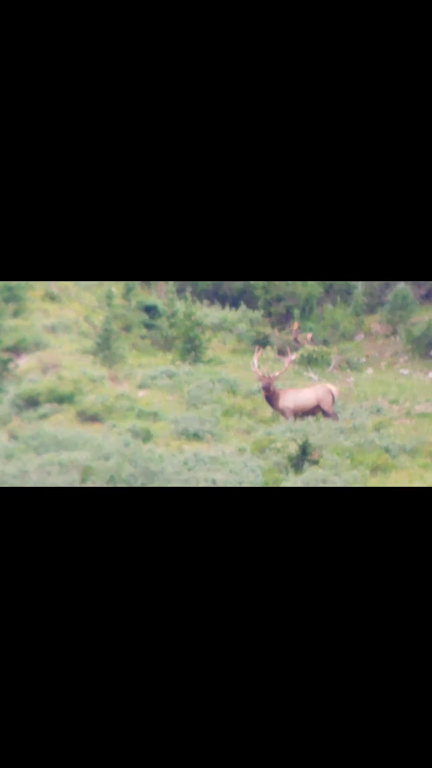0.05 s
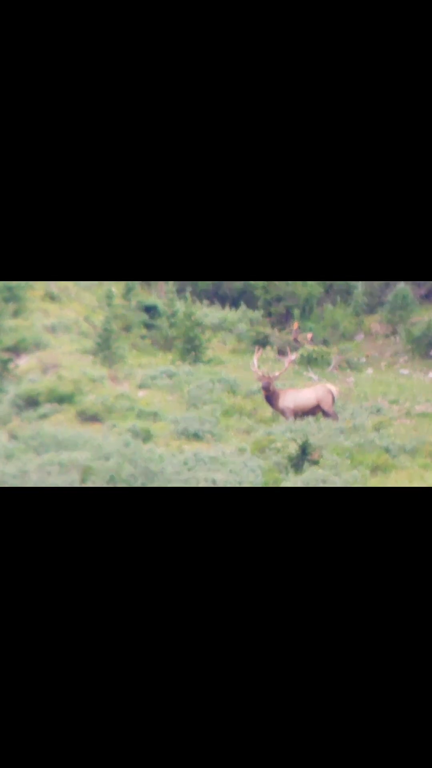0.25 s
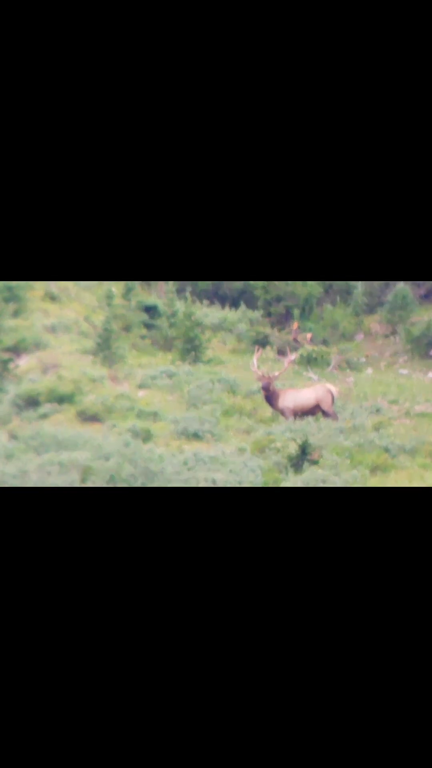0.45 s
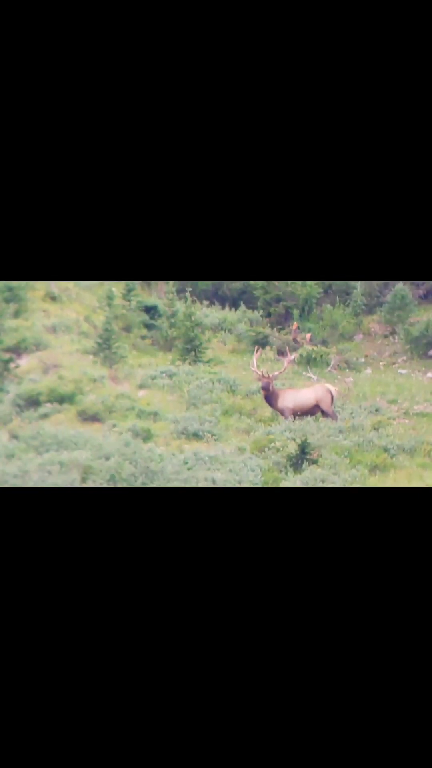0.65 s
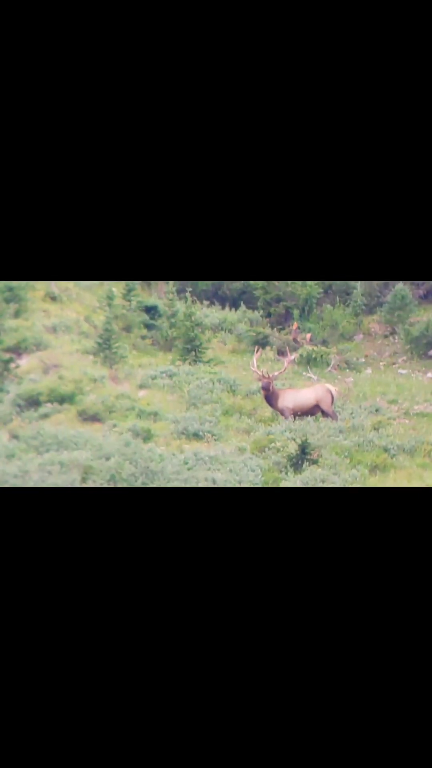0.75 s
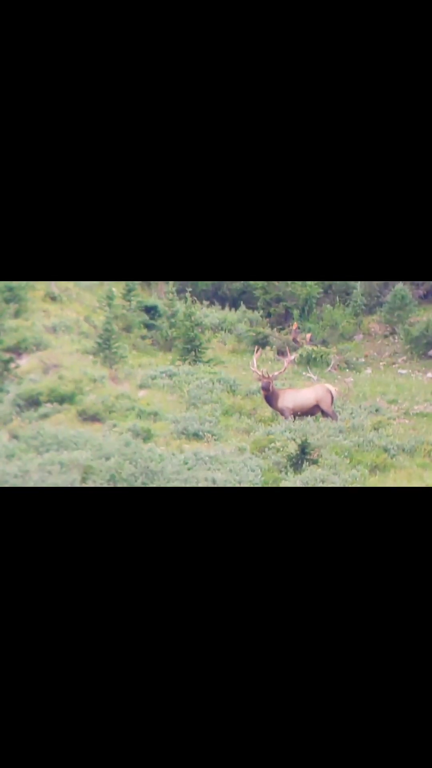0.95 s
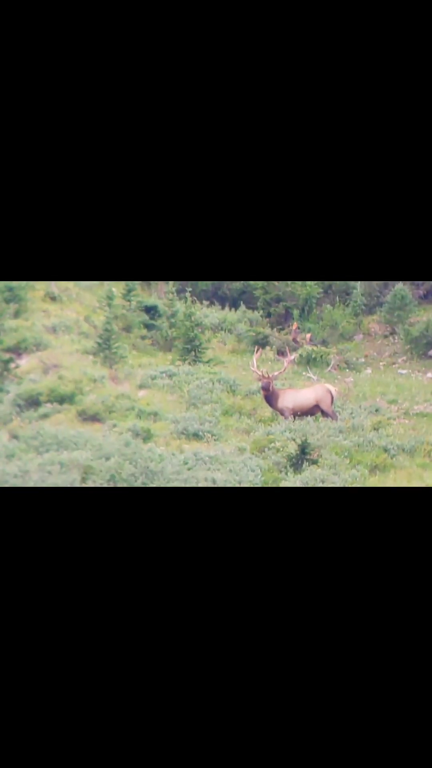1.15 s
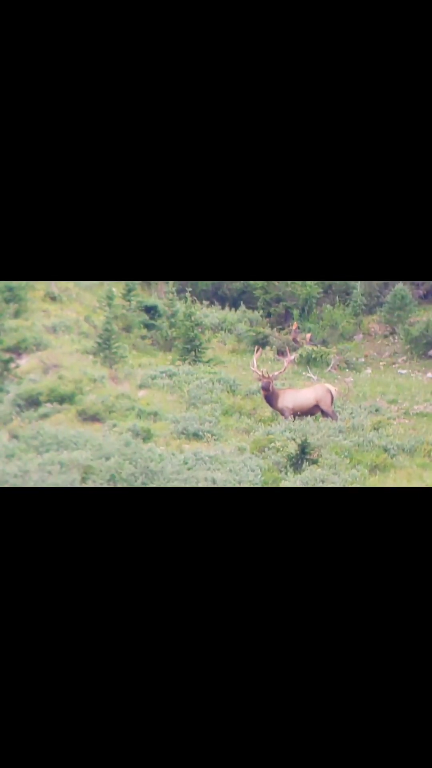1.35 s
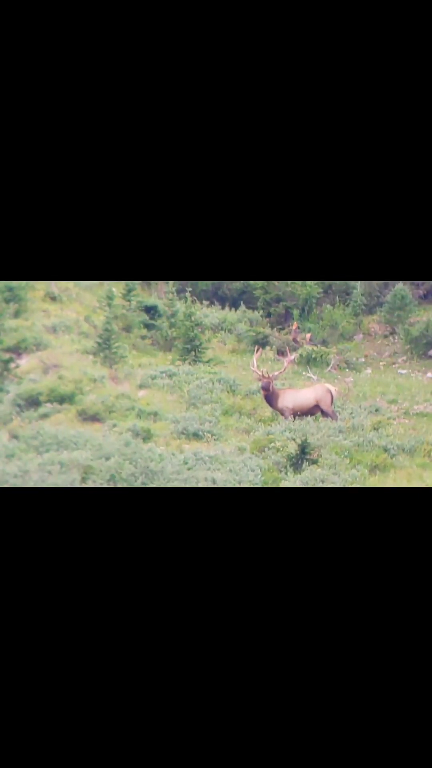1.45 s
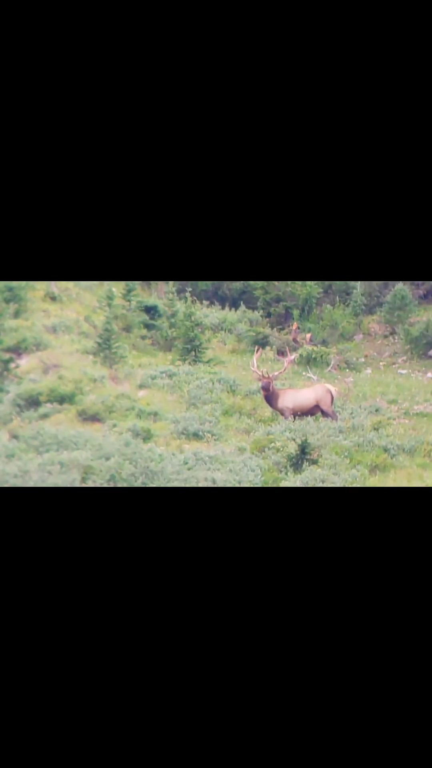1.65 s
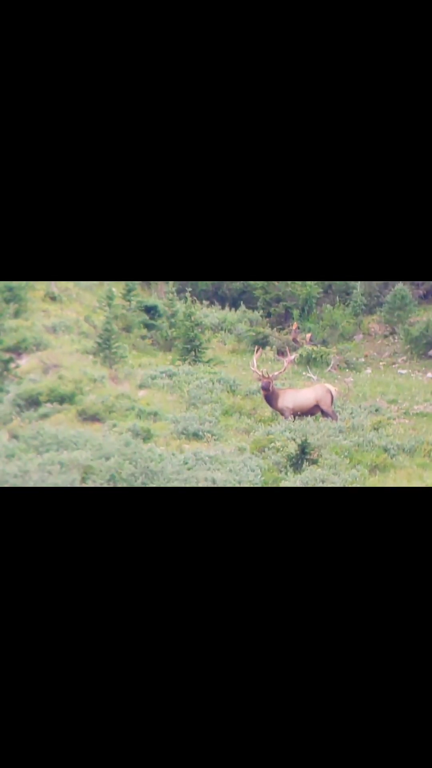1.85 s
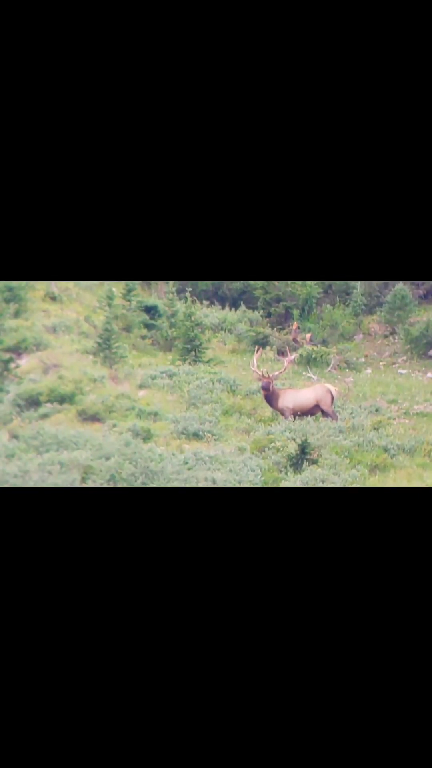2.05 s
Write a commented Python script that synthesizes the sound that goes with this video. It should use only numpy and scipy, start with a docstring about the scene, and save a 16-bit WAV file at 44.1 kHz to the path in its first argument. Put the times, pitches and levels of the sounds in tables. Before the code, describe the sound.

A fly buzzes close to the microphone on the left, coming in at about 0.2 seconds with a slightly wavering pitch. It is loudest near 0.5 seconds, swerves past and is gone by 0.9. A tiny, faint rustle comes at around 0.4 seconds. Light wind rumbles throughout with soft bumps on the microphone, easing toward the end at 2 seconds, over a faint hiss and a distant rush.

```python
"""Light wind rumbles in an open meadow, over a faint hiss and a far rush, like a road, from the right.
Almost at once a fly buzzes up to the left port of the microphone, hovers, swerves past and is gone.
Its wingbeat is a stack of harmonics whose balance shifts as it turns. Eddies bump each port on its
own throughout, and something rustles briefly as the fly comes alongside."""
import sys
import numpy as np
from scipy import signal
from scipy.fft import rfft, irfft
from scipy.io import wavfile
from scipy.ndimage import uniform_filter1d

SR = 44100
rng = np.random.default_rng(int(sys.argv[2]) if len(sys.argv) > 2 else 0)


def to_wav(s):
    """Save 16-bit WAV."""
    ch = np.atleast_2d(s).T  # columns
    pcm = np.round(np.clip(ch, -1, 1) * 32767)  # PCM
    wavfile.write(sys.argv[1], SR, pcm.astype(np.int16))


N = 92610

# tone of the wind's rumble: frequency_hz, gain_db
RUMBLE_EQ = [(12, -9), (25, 0), (70, -2), (110, -10), (200, -25), (350, -39), (800, -77)]
# eddies bumping a port: peak_s, level_db, pitch_hz, width_s, port (0 left, 1 right)
WIND_BUMPS = [(0.088, -38, 59.9, 0.019, 0), (0.24, -29, 50, 0.017, 0), (0.547, -34.5, 60.6, .008, 0),
              (0.857, -29, 140.6, 0.0026, 0), (.89, -43, 40.25, 0.033, 0), (1.301, -39, 43, 0.021, 0),
              (1.607, -42, 40.5, 0.012, 0), (0.048, -39.5, 36, 0.022, 1), (0.498, -26, 45, 0.0093, 1),
              (0.614, -34.5, 51.7, 0.0093, 1), (1.147, -39, 39.2, 0.034, 1), (1.254, -25.5, 84, 0.0047, 1),
              (1.296, -36.5, 41.3, 0.045, 1), (1.541, -35.5, 59.5, 0.009, 1), (1.645, -27.5, 61, 0.0049, 1),
              (1.782, -38.5, 51, 0.012, 1), (1.815, -28.5, 48, 0.0053, 1), (1.97, -39, 40.3, 0.014, 1)]
RUMBLE_START_DB, GUST_DB, LULL_DB_PER_S = (-50.5, -48), 2, -5  # starting levels: left, right
TURBULENCE_DB, WAKE_S = -14.5, 0.009  # a bump's wake: level against the bump, extra width

# tone of the far rush: frequency_hz, gain_db
RUSH_EQ = [(200, -15.5), (500, -19.5), (700, -10.5), (830, -2.5), (1000, -3), (1300, 2.5), (1500, 1),
           (1720, 0.5), (2000, -8), (2500, -15), (3000, -27.5), (6000, -52.5)]
# fader ride on the far rush: time_s, level_db
RUSH_LEVEL = [(0, -59), (.2, -59), (.6, -57), (.93, -65), (1.2, -60), (1.45, -63), (1.68, -61),
              (1.85, -66.5), (2.1, -68.5)]
# duller tone of the rush at the left port, which faces away: frequency_hz, gain_db
SHADOW_EQ = [(600, 3), (850, 4.5), (1000, -1), (1300, 0.5), (1600, -9.5), (2000, -13), (2500, -9.5)]
LEFT_LAG_S = .00046
WHINE_HZ, WHINE_DB, WHINE_PEAK_S, WHINE_WIDTH_S = 812, -60.5, 1.376, 0.021

# tone of the air and microphone hiss: frequency_hz, gain_db
HISS_EQ = [(250, 1.5), (1600, -1.5), (2300, -10.5), (6000, -24), (7300, -23.5), (8500, -35), (10000, -32.5),
           (11500, -26.5), (15000, -30)]
HISS_START_DB, HISS_FADE_DB_PER_S = -66, -2.5

# the fly's wingbeat: time_s, pitch_hz
WINGBEAT = [(0.0, 380.8), (0.06, 376.3), (0.095, 390.2), (0.122, 359), (0.142, 352), (0.16, 378),
            (0.178, 382.8), (0.197, 365), (0.222, 373.6), (0.238, 383.5), (0.256, 378.8), (0.272, 391.9),
            (0.288, 379.7), (0.304, 374.5), (0.325, 393.7), (0.339, 387.5), (0.351, 400.7), (0.367, 380),
            (0.382, 386), (0.401, 376.1), (0.418, 391), (0.452, 389.7), (0.482, 381.1), (0.508, 386.1),
            (0.523, 396.6), (0.549, 362.8), (0.603, 376.3), (0.626, 365), (0.65, 390.0), (0.668, 363),
            (0.697, 383.5), (0.716, 363), (0.739, 392.2), (0.75, 371.5), (0.764, 396.6), (0.786, 378.4),
            (0.814, 400.7), (0.835, 382), (0.88, 388.7)]
# fader rides on the buzz: time_s, fundamental_db, octave_db, fourth_db, middle_db, treble_db
BUZZ_LEVELS = [(0.0, -63, -64.5, -79, -81, -81), (0.1, -55, -49.5, -75, -70, -82),
               (0.125, -56, -53, -71.5, -71, -83.5), (0.172, -34.5, -34.5, -44, -55.5, -72.5),
               (0.2, -32, -40, -49.5, -55, -76.5), (0.27, -29, -33.5, -47, -50.5, -69.5),
               (0.335, -30, -30.5, -44.5, -51, -67.5), (0.356, -26, -26.5, -43, -45.5, -58),
               (0.395, -26.5, -31.5, -44.0, -47, -57.0), (0.425, -23.5, -24.5, -38, -44.5, -55.5),
               (0.46, -21, -24, -34.0, -43, -57.5), (0.485, -22.5, -27, -36, -46, -68.5),
               (0.508, -18, -24, -36.0, -40.5, -54), (0.532, -15.5, -26.0, -30, -41.5, -70.5),
               (0.56, -21, -38.5, -43, -46.5, -69), (0.595, -25, -55.5, -53, -46.5, -71),
               (0.632, -23.5, -38.0, -46.0, -44.0, -62.5), (0.652, -26, -53, -53.5, -52, -75.0),
               (0.678, -31.5, -34, -52, -47, -64.5), (0.697, -37, -45, -72.5, -60.5, -74),
               (0.722, -28.5, -41.0, -65.5, -48.0, -65.5), (0.75, -35.5, -39, -64, -54, -76.5),
               (0.775, -36.5, -35, -49, -51.5, -66.5), (0.815, -34, -36.0, -52.5, -49, -70),
               (0.836, -34.5, -39.5, -64, -57.5, -77), (0.856, -39.5, -31.0, -52, -51.5, -67.5),
               (0.895, -74, -66, -77, -81.5, -89)]
# trims on harmonics 5 to 9, a row each, along the fly's path: coming_db, beside_db, leaving_db
MIDDLE_TRIMS = [(0.5, -0.5, -0.5), (-6, -5, -4), (-3, -6.5, -6), (-9.5, -5.5, -14), (-11, -13, -21)]
# tone of harmonics 10 to 28: frequency_hz, coming_db, leaving_db
TREBLE_EQ = [(3800, 1.5, -0.5), (4260, -3.5, -7), (4550, -10, -9.5), (5300, -9.5, -5.5),
             (6080, -8.5, -12.5), (6600, -21, -25.5), (8000, -35, -32), (11000, -42.5, -41.5)]
# tone of the air stirred by the wings: frequency_hz, gain_db
SWISH_EQ = [(200, 7), (600, -12), (1100, -2), (3000, -2.5), (4500, -7.5), (6400, -9), (8500, -27),
            (12000, -17.5), (13000, -36.5)]
ARRIVES_S, CLOSEST_S, SWERVE_S = .34, 0.552, .01  # the fly comes alongside, then swerves past
PITCH_JITTER, SHIMMER_DB, TURN_DB = .002, .5, 2.5  # wander: pitch, whole buzz, each upper harmonic
THIRD_COMING_DB, THIRD_LEAVING_DB = -12, -9  # third harmonic, against the fundamental
SWISH_DB, SWISH_FOLLOW, SWISH_DEPTH = -62, 0.49, .7  # at top treble; share of its swing; stroke pulse
FLY_RIGHT_DB = -64.5  # against the left port

# swells of the rustle: peak_s, level_db, width_s
RUSTLES = [(.357, -55.5, 0.016), (.398, -53, 0.011), (.535, -63, 0.012)]
# tone of the rustle: frequency_hz, gain_db
RUSTLE_EQ = [(300, -10.5), (1000, -1.5), (2200, 2), (3000, -6), (5000, -14.5), (7000, -16.5), (8500, -32.5),
             (12000, -25.5), (13000, -51)]
RUSTLE_LEFT_BOOST_DB = 3.5

HIGH_CUT_HZ = 15400


def undb(db):
    """Decibels as a gain."""
    return 10 ** (np.asarray(db) / 20)


def curve(table, col=1):
    """A column of a table, joined by straight lines in time."""
    rows = np.array(table, float)
    return np.interp(np.arange(N) / SR, rows[:, 0], rows[:, col])


def eq_gain(eq, hz, col=1):
    """Gain of an EQ curve at the given frequencies."""
    rows = np.array(eq, float)
    return undb(np.interp(np.log(np.maximum(hz, 1)), np.log(rows[:, 0]), rows[:, col]))


def noise(eq):
    """Noise shaped by an EQ curve, rms 1."""
    hz = np.arange(N // 2 + 1) * SR / N
    x = irfft(rfft(rng.standard_normal(N)) * eq_gain(eq, hz), N)
    return x / x.std()


def wander(rate_hz):
    """Smooth random modulation, spread 1."""
    hold = max(int(SR / rate_hz), 2)
    steps = np.repeat(rng.standard_normal(N // hold + 1), hold)
    x = uniform_filter1d(uniform_filter1d(steps, hold), hold)[:N]
    return x / x.std()


def swell(peak_s, width_s):
    """A bell-shaped envelope, top 1."""
    return np.exp(-.5 * ((np.arange(N) / SR - peak_s) / width_s) ** 2)


def wind():
    """Each port gets its own gusty rumble, and eddies that bump it briefly inside a wider wake."""
    t = np.arange(N) / SR
    ports = np.array([noise(RUMBLE_EQ) * undb(db + GUST_DB * wander(12.1) + LULL_DB_PER_S * t)
                      for db in RUMBLE_START_DB])
    turbulence = undb(TURBULENCE_DB) * noise(RUMBLE_EQ)
    for (peak_s, db, hz, width_s, port), offset in zip(WIND_BUMPS, rng.random(len(WIND_BUMPS))):
        core, wake = (undb(db) * np.exp(1 - np.hypot(1, (t - peak_s) / width))
                      for width in (width_s, width_s + WAKE_S))
        thump = core * np.cos(2 * np.pi * (hz * (t - peak_s) + offset))
        ports[int(port)] += thump + wake * turbulence
    return ports


def far_rush():
    """A distant rush with one faint whine, from the right: it reaches the left port later and duller."""
    whine_hz = WHINE_HZ * (1 + .012 * wander(60.1))
    whine_level = undb(WHINE_DB + 1.1 * wander(16.2)) * swell(WHINE_PEAK_S, WHINE_WIDTH_S)
    whine = whine_level * np.sin(2 * np.pi * np.cumsum(whine_hz) / SR)
    right = noise(RUSH_EQ) * undb(curve(RUSH_LEVEL) + wander(25)) + whine
    hz = np.arange(N // 2 + 1) * SR / N
    delay = np.exp(-2j * np.pi * hz * LEFT_LAG_S)
    left = irfft(rfft(right) * eq_gain(SHADOW_EQ, hz) * delay, N)
    return np.array([left, right])


def hiss():
    """A faint bed of air and microphone hiss, unrelated on the two ports, slowly sinking."""
    fade = undb(HISS_START_DB + HISS_FADE_DB_PER_S * np.arange(N) / SR)
    return np.array([noise(HISS_EQ), noise(HISS_EQ)]) * fade


def fly():
    """Wingbeat harmonics, coloured differently ahead of, beside and behind the fly; strokes stir air."""
    t = np.arange(N) / SR
    pitch_hz = curve(WINGBEAT) * (1 + PITCH_JITTER * wander(220))
    phase = 2 * np.pi * np.cumsum(pitch_hz) / SR
    first_db, octave_db, fourth_db, middle_db, treble_db = (curve(BUZZ_LEVELS, c) for c in range(1, 6))
    # crossfades from 0 to 1 as the fly draws level and as it passes
    arrived, passed = ((1 + np.tanh((t - at) / SWERVE_S)) / 2 for at in (ARRIVES_S, CLOSEST_S))
    # body: harmonics 1 to 4
    third_db = first_db + THIRD_COMING_DB * (1 - passed) + THIRD_LEAVING_DB * passed + wander(18)
    body_db = (first_db, octave_db, third_db, fourth_db)
    buzz = -sum(undb(db) * np.cos(k * phase) for k, db in enumerate(body_db, 1))
    # edge: harmonics 5 to 28, each drifting on its own in level and phase
    edge = [undb(middle_db + coming * (1 - arrived) + beside * (arrived - passed) + leaving * passed)
            for coming, beside, leaving in MIDDLE_TRIMS]
    for k in range(10, 29):
        coming, leaving = (eq_gain(TREBLE_EQ, k * pitch_hz, col) for col in (1, 2))
        edge.append(undb(treble_db) * (coming * (1 - passed) + leaving * passed))
    for k, gain in enumerate(edge, 5):
        buzz -= gain * undb(TURN_DB * wander(45)) * np.cos(k * phase + 0.44 * wander(8))
    swish_level = undb(SWISH_DB + SWISH_FOLLOW * (treble_db - treble_db.max()))
    swish = swish_level * (1 + SWISH_DEPTH * np.cos(phase)) * noise(SWISH_EQ)
    fade_out = np.clip((BUZZ_LEVELS[-1][0] - t) / 0.011, 0, 1)
    left = (buzz * undb(SHIMMER_DB * wander(200)) + swish) * fade_out
    return np.array([left, left * undb(FLY_RIGHT_DB)])


def rustle():
    """Short, uneven rustles near the microphone, leaning left."""
    envelope = sum(undb(db) * swell(peak_s, width_s) for peak_s, db, width_s in RUSTLES)
    return np.array([noise(RUSTLE_EQ) * envelope * undb(db + 1.5 * wander(240))
                     for db in (RUSTLE_LEFT_BOOST_DB, 0)])


def scene():
    """The stereo mix: meadow bed behind, fly and rustle up close."""
    return wind() + far_rush() + hiss() + fly() + rustle()


def record(dry):
    """The recorder's steep high cut."""
    return signal.sosfilt(signal.ellip(8, .2, 70, HIGH_CUT_HZ, fs=SR, output="sos"), dry)


dry = scene()
out = record(dry)
to_wav(out)
```